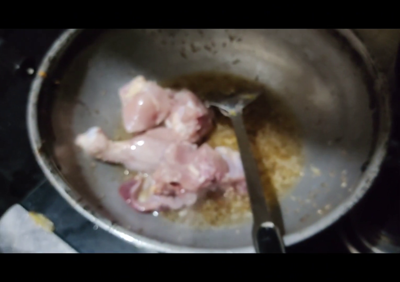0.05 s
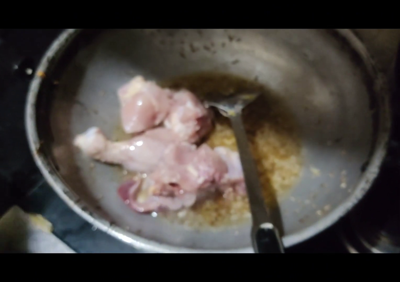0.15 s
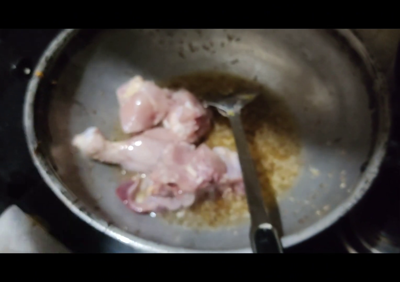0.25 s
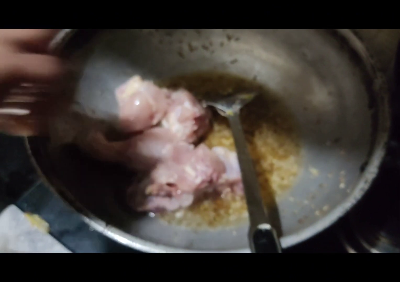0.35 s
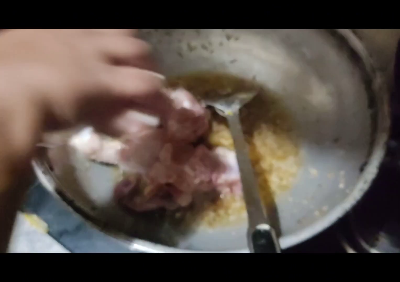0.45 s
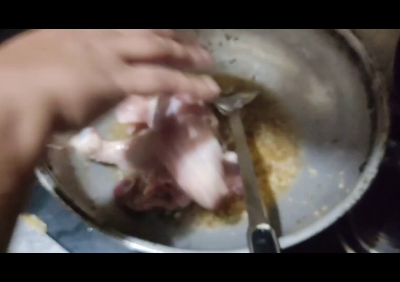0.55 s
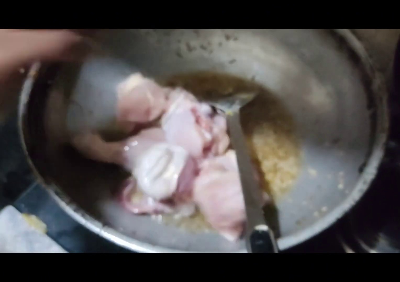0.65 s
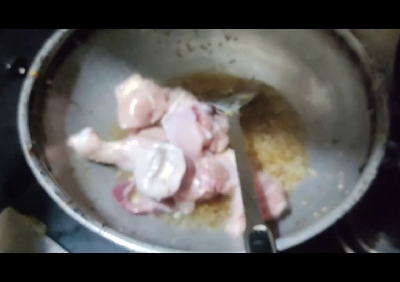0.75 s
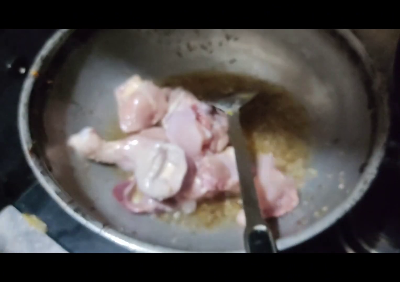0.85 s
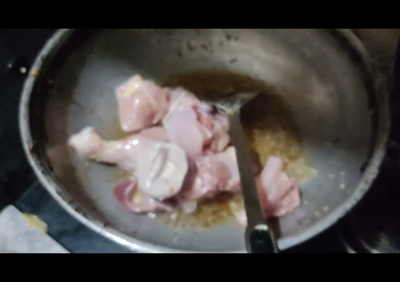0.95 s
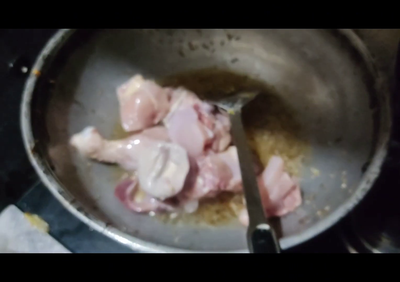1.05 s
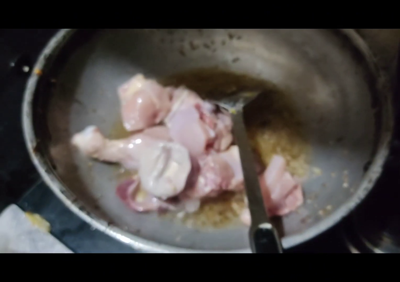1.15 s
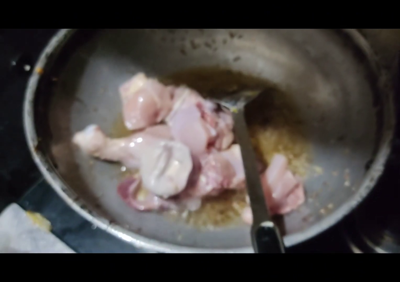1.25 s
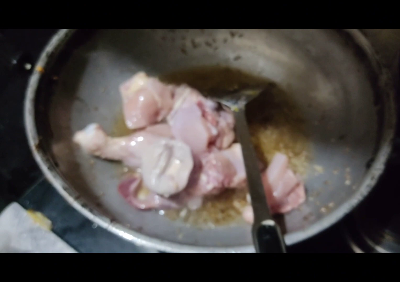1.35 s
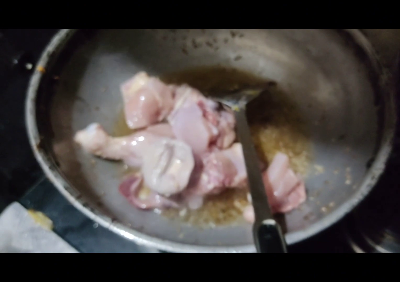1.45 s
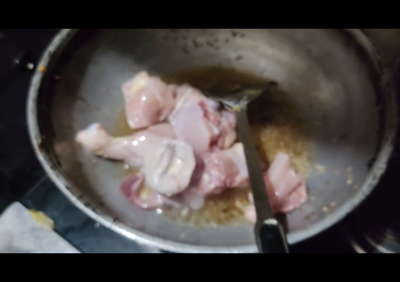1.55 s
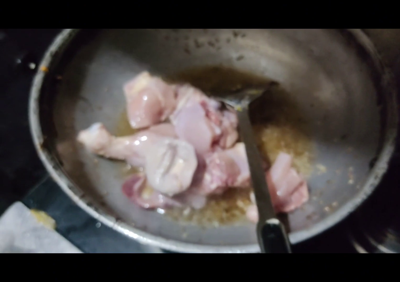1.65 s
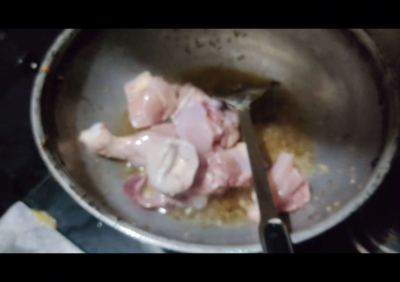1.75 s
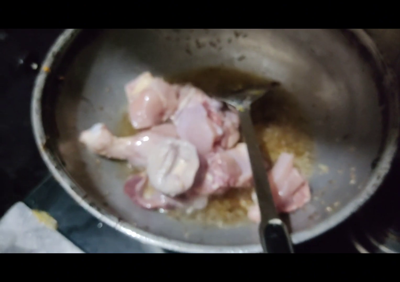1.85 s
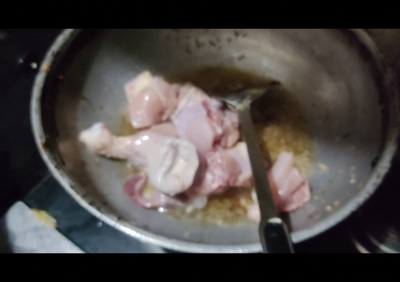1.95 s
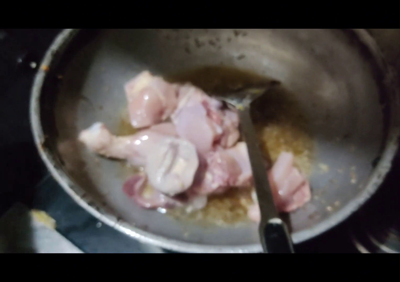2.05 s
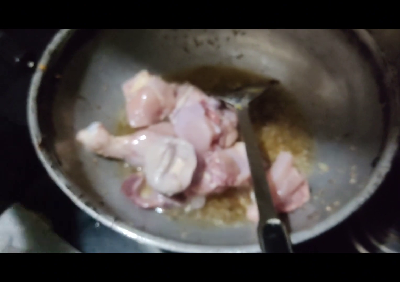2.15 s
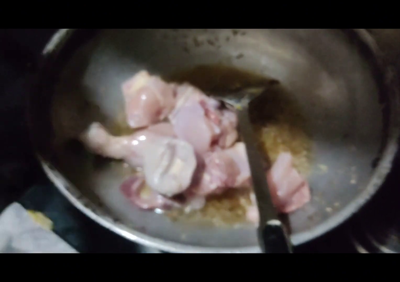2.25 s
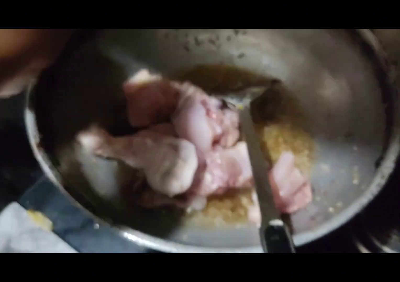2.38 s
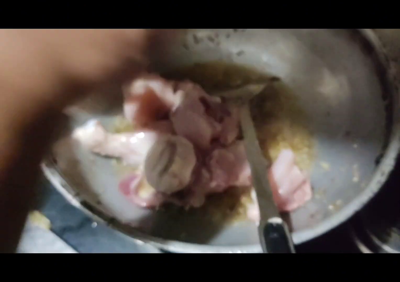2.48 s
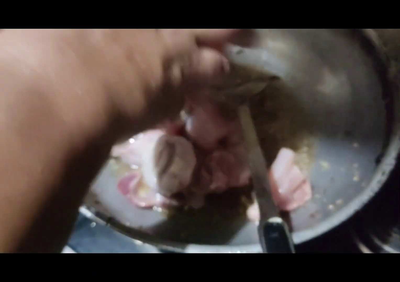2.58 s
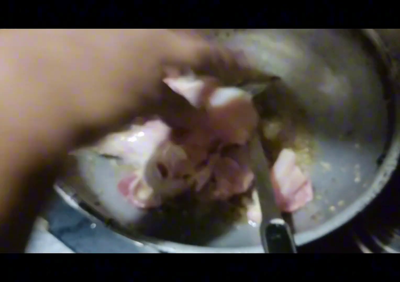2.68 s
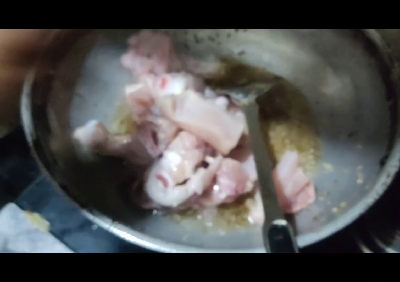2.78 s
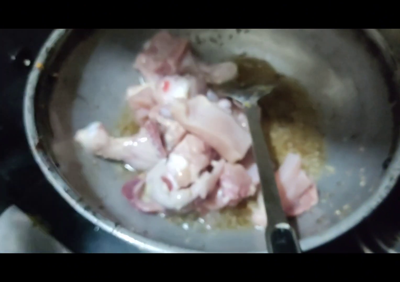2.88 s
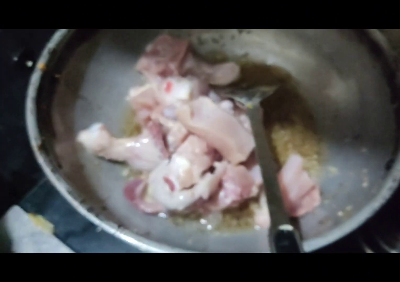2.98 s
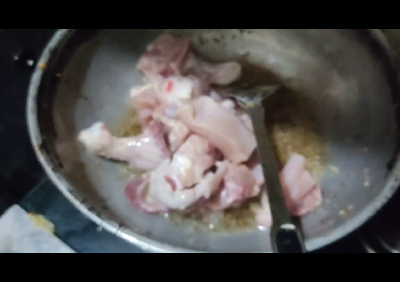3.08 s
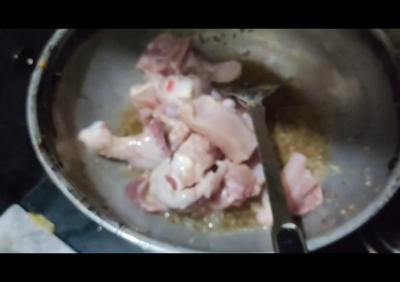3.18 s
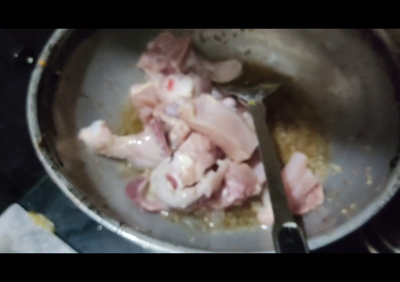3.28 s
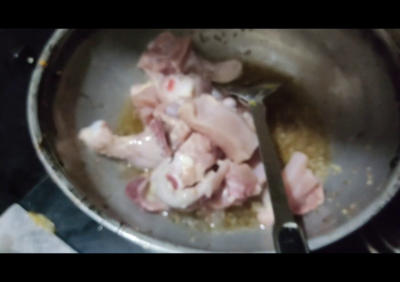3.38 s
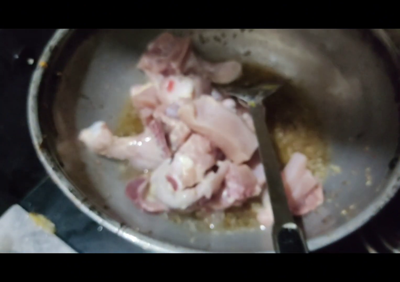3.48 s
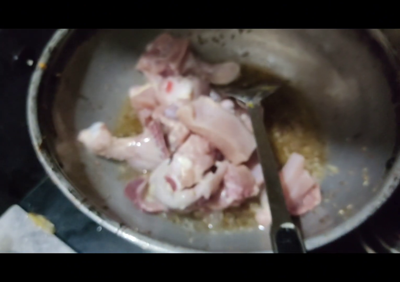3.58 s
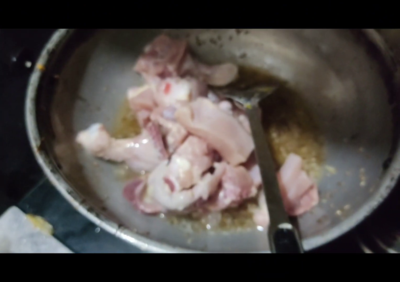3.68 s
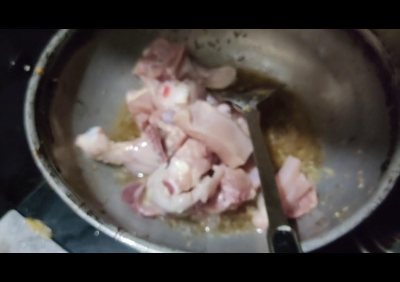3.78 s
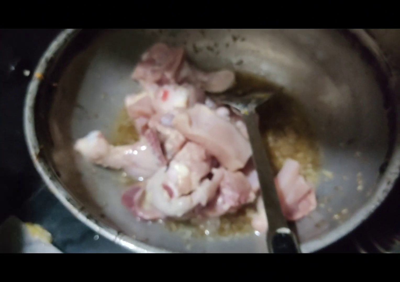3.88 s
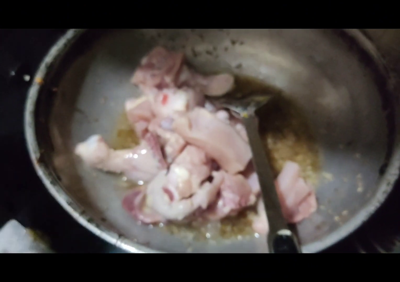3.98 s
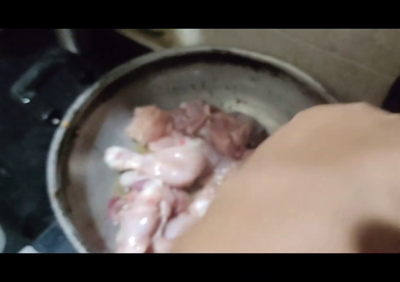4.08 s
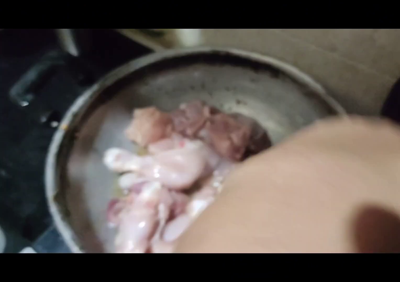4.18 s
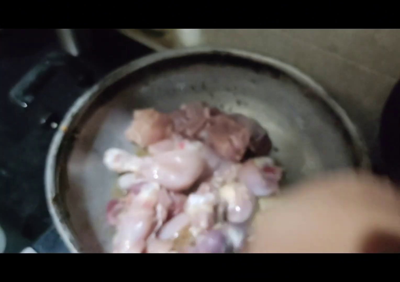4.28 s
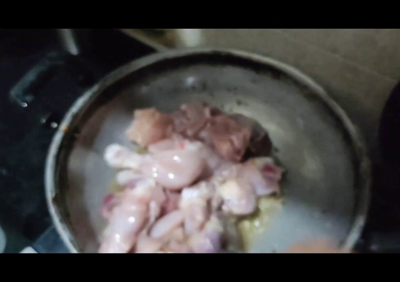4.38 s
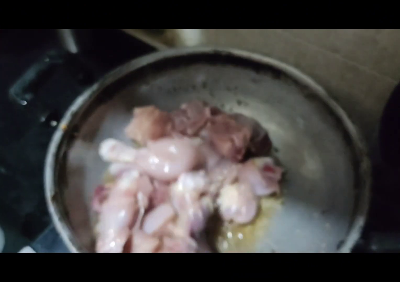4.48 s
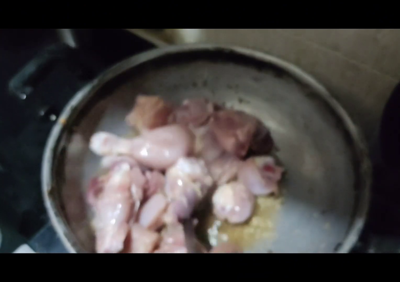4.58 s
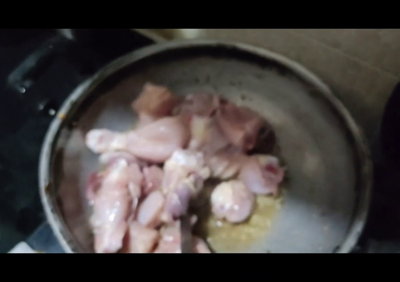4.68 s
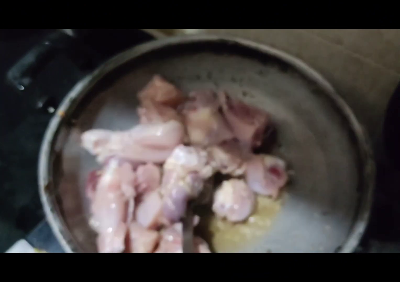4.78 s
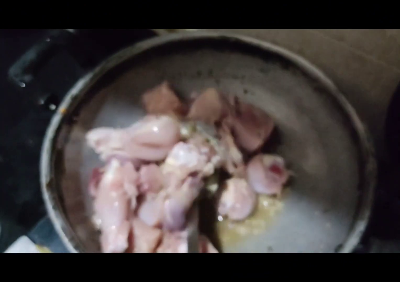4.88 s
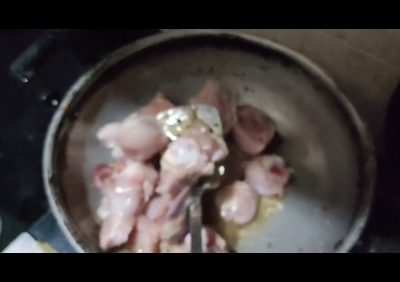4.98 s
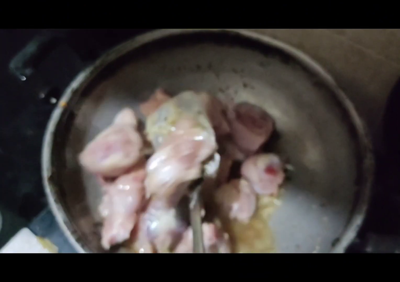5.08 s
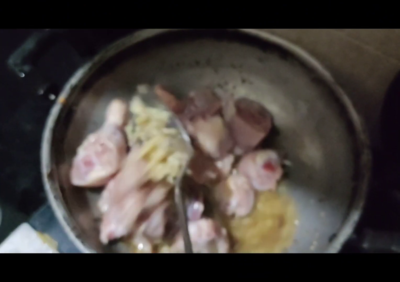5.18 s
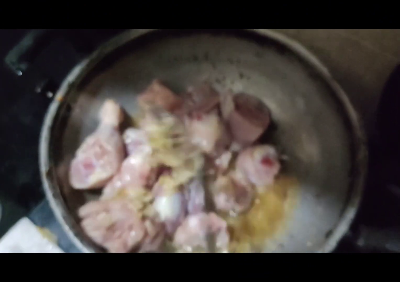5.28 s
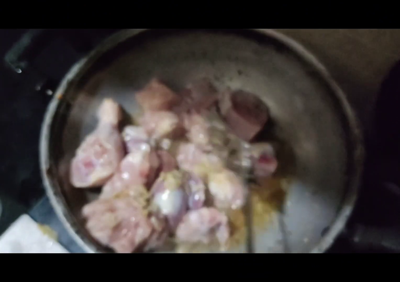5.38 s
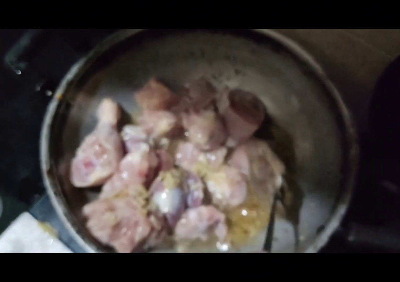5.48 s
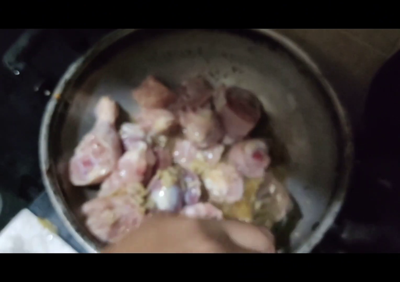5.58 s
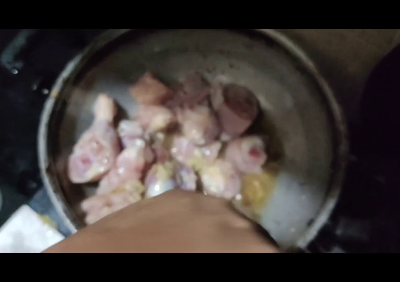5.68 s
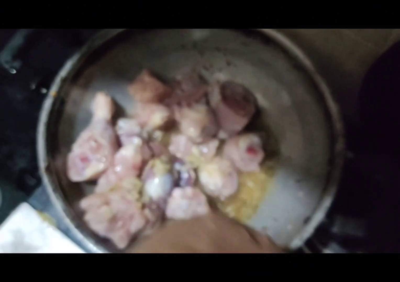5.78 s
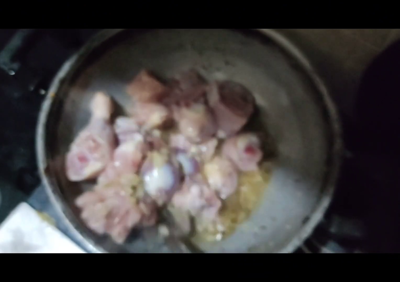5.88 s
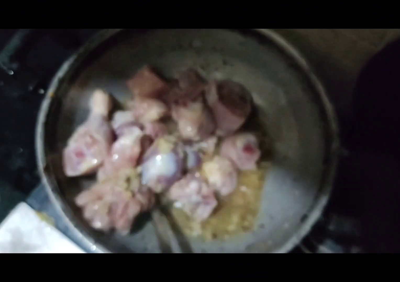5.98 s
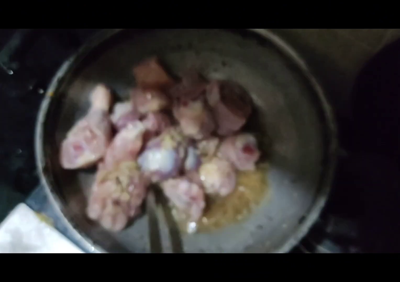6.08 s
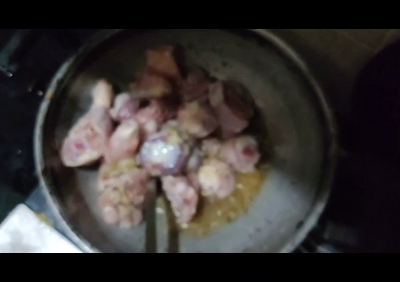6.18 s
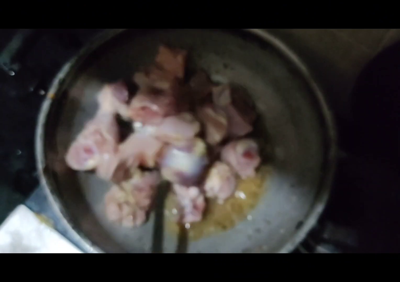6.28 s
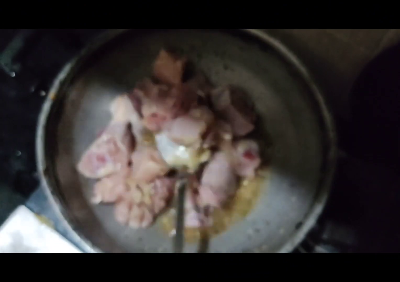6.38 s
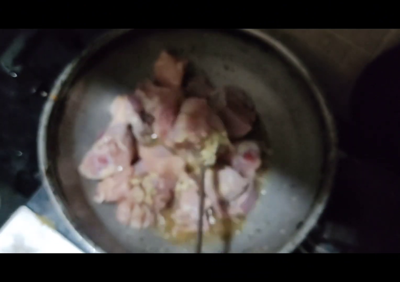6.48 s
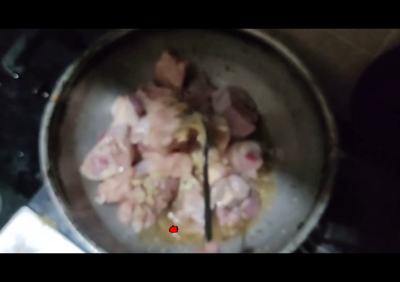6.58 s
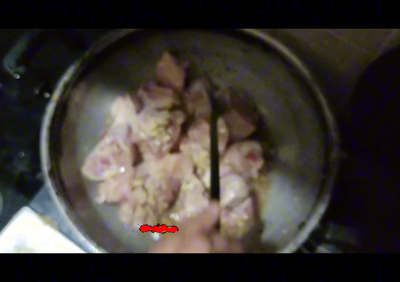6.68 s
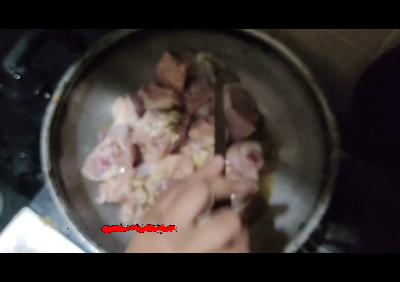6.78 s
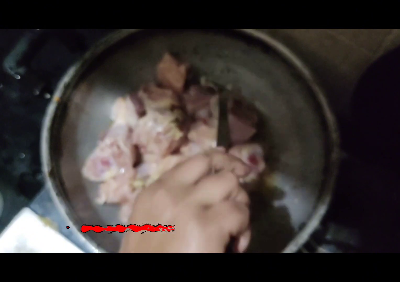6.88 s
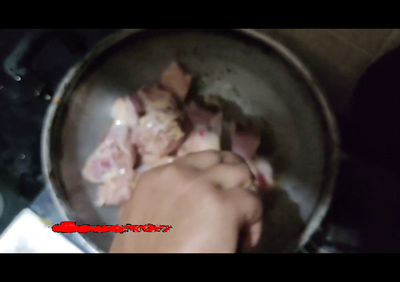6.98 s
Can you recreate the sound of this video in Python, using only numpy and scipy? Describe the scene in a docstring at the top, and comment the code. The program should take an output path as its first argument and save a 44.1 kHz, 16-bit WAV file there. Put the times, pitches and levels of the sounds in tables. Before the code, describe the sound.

A low burner roar and very faint oil fizz run throughout in a small, slightly reflective kitchen, heard close up with handling rumble. At 0.2-0.8 s raw chicken lands in a steel pan: soft dull thuds, wet smacks, a little squelch. A small thump comes at 1.2, then near quiet. At 2.2-2.5 more pieces land with crisp wet crackles, with softer smacks at 2.8 and 3.2. Around 3.65-4.1 faint metal rasping and a weak squeal begin; at 4.3-4.4 meat thumps and the spoon clanks sharply. Wet spits and soft thuds follow to 5.0. At 5.2 a strong clank leads into a bright gritty scrape, with a rough squeal near 5.4, fading by 5.7. A sharp knock at 5.76 joins heavy thuds, then moist tumbling and squelching to 6.8. At 6.92-7.1 a hard low double clank and short scrape finish.

```python
"""A burner rumbles and oil sizzles faintly under a steel pan in a small kitchen, close to a hand-held camera.
Raw chicken drops in from the start: soft pushes ring the pan's bottom, juice films smack, trapped air squelches.
From the middle on a metal spoon stirs: it knocks on steel that the food damps, rubs it with a sliding rasp,
and its edge sticks and slips into squeals, while the meat goes on thudding and smacking wetly."""
import sys
import numpy as np
from scipy import signal
from scipy.fft import rfft, irfft
from scipy.io import wavfile
from scipy.ndimage import uniform_filter1d

SR = 44100
rng = np.random.default_rng(int(sys.argv[2]) if len(sys.argv) > 2 else 0)


def dump_mix(stems):
    """Bounce the given channels to the path in sys.argv[1] as a 16-bit WAV at rate SR."""
    frames = np.atleast_2d(stems).T  # one column per channel
    limited = np.clip(frames, -1, 1)  # hard clip at full scale
    pcm = np.round(limited * 32767).astype(np.int16)
    wavfile.write(sys.argv[1], SR, pcm)


N = 310905
TIME = np.arange(N) / SR

# resonances of the food-damped pan: centre_hz, width_hz, height_db over the broad response
PAN_MODES = [(177.4, 11.3, 14.5), (238, 25, 10.5), (417.7, 19.5, 13), (462, 36, 13.5), (597.6, 20, 9),
             (877, 17, 4), (1078, 26, 6), (1400, 180, 5.5), (1650, 52, 6.5), (1990, 18, 9), (2760, 14, 6.5),
             (6030, 66, 4.5), (6440, 51, 8.5), (8040, 160, 4.5)]
# broad response to a soft push: frequency_hz, relative level_db
SOFT_PUSH = [(30, 10.5), (90, -9), (200, -1), (320, -3.5), (500, -4.5), (850, -5.5), (1500, -17.5),
             (4000, -20)]
# broad response of wet films and spits: frequency_hz, relative level_db
WET_FILM = [(400, 6.5), (900, 7.2), (1500, 2.5), (2400, 4.4), (3300, 0.96), (5000, 5.7), (8000, 6.2),
            (11000, 6.5), (15000, 4.1)]
# the spoon's edge catches and squeals: start_s, length_s, first_hz, last_hz, level_db before trim, tilt_db per octave
EDGE_SQUEALS = [(3.664, 0.188, 929, 971, -34.5, -12.5), (5.293, 0.07, 991, 1025, -26.5, -0.5),
                (5.368, 0.035, 1012, 1016, -17, 4), (5.408, 0.039, 1005, 989, -20, -2),
                (5.43, .063, 997, 1000, -36.5, -14), (7.025, 0.067, 1017, 1013, -32, -8)]
SNAP_S = 0.0085  # decay as a film of juice tears
MOVE_RISE_S, MOVE_SETTLE_S = 0.03, 0.061


def clanks(rise_s=0.0031, treble_trim_db=2, middle_trim_db=1, bass_trim_db=-4, flex_trim_db=-2.5):
    """The spoon chatters on the steel, waking wall or base; the bottom flexes in step with the bass level."""
    # spoon on pan: start_s, treble_db, middle_db, bass_db (before trims), chatter_s, spot_hz, place (0 base to 1 wall)
    knocks = [(3.652, -35.5, -39.5, -34, 0.028, 540, 0.21), (4.2943, -43, -31, -52, 0.002, 1150, .2),
              (4.377, -18, -19, -31, 0.0051, 1130, 1), (4.926, -48, -32, -23.5, 0.0089, 534, 0.44),
              (4.937, -45, -30.5, -33, 0.0037, 560, 0.24), (5.214, -16, -13, -14.5, 0.0063, 920, 0),
              (5.7628, -15, -17.5, -35.5, 0.0046, 1470, 1), (5.948, -42.5, -42.5, -43, 0.013, 2780, 0.97),
              (6.022, -54, -46, -38, 0.012, 2070, 0), (6.122, -38.5, -41.5, -42.5, 0.0083, 1390, 0.44),
              (6.666, -41.5, -38, -49, 0.015, 1380, 0.4), (6.711, -46, -37.5, -25, 0.022, 537, 0.48),
              (6.744, -48, -33.5, -39, 0.0096, 1260, 0.16), (6.9233, -15, -22.5, -9, .0052, 560, 0.46),
              (6.9353, -18.5, -24.5, -19.5, 0.014, 610, 0.43),
              (6.9894, -21.5, -30, -46, .0021, 8200, 0.0067)]
    # modes woken by a blow on the wall: centre_hz, width_hz, height_db
    wall_modes = [(2470, 170, 12), (4380, 145, 13), (5280, 140, 13), (6080, 130, 4)]
    # modes woken by a blow on the base: centre_hz, width_hz, height_db
    base_modes = [(2010, 110, 4.1), (3690, 400, 6.4), (4220, 180, 7.6)]
    # broad response to a metal blow: frequency_hz, relative level_db
    metal = [(100, 1.5), (320, -28.5), (550, -4), (1000, 3), (1800, -3), (2500, -2), (3300, -4), (4500, -2),
             (6500, 2), (8300, 0.5), (15000, -16.5)]
    flex_delay_s = 0.001627  # the bass answers this long after the edge lands
    flex_hz, flex_rise_s, flex_decay_s = 541, 0.0024, 0.0033  # the dented bottom springs back in a few swings
    spot_width_hz, spot_db = 300, 7
    out, t = np.zeros((2, N)), TIME[:2048]
    flex = at_ports(flex_hz * t) * (1 - np.exp(-(t / flex_rise_s) ** 2)) * np.exp(-t / flex_decay_s)
    for s, treble, middle, bass, chatter_s, spot_hz, wall in knocks:
        struck = [(hz, width, db * wall) for hz, width, db in wall_modes]
        struck += [(hz, width, db * (1 - wall)) for hz, width, db in base_modes]
        struck.append((spot_hz, spot_width_hz, spot_db))
        hit = ring(chatter(rise_s, chatter_s), response(metal, PAN_MODES + struck))
        levels = treble + treble_trim_db, middle + middle_trim_db, bass + bass_trim_db
        for part, db, late_s in zip(split(hit), levels, (0, 0, flex_delay_s)):
            add(out, s + late_s, crest(part, db))
        add(out, s + flex_delay_s, crest(flex, bass + flex_trim_db))
    return out


def chatter(rise_s, decay_s, uneven_db=4):
    """A metal edge bounces in a quick string of contacts, a few much harder than the rest."""
    flurry = burst(rise_s, decay_s)
    return flurry * amp(uneven_db * np.clip(rng.standard_normal(flurry.shape[1]), -2, 2))


def scrapes(judder_db=1.0, hiss_trim_db=1, rasp_db=-2, broad_db=-7, body_trim_db=-2, grip=0.089):
    """The edge catches on countless scratches; rasping resonances slide with the point of contact."""
    # spoon pushed along steel: start_s, rise_s, fall_s, hiss_db, middle_db, body_db (before trims),
    # rasp_hz at the pressure peak, slide_hz per s
    pushes = [(3.657, 0.11, 0.34, -33.5, -36, -38.5, 2450, -1000),
              (3.931, 0.21, .17, -39.5, -34, -60.5, 2080, -2300),
              (5.265, 0.11, 0.24, -26, -31.5, -41.5, 2407, -300),
              (5.366, 0.062, 0.02, -22, -34, -43, 3370, 1500),
              (5.52, 0.083, .2, -28.5, -29, -45.5, 2067, -2200),
              (6.985, 0.031, .12, -23.5, -30.5, -39, 1974, -1000)]
    # the rasp's sliding resonances: multiple of its centre, level_db
    rasp_peaks = [(0.702, 9), (.86, 14.5), (1, 14.5), (1.17, 8), (1.42, 3), (1.78, 12.5)]
    # broad response to rubbing: frequency_hz, relative level_db
    rubbed = [(100, -14), (320, -19), (550, -2.5), (1000, 4.5), (1550, -7.5), (2600, -1), (4000, 0.5),
              (6500, 3.5), (8300, -0.5), (9700, -2.5), (12000, -6.5), (15000, -12)]
    rasp_waver = 0.029  # the point of contact wanders, as a share of the resonance
    out = np.zeros((2, N))
    slip_hz = np.interp(TIME, [row[0] for row in EDGE_SQUEALS], [row[2] for row in EDGE_SQUEALS])
    sticking = grip * sum(arch(s, length) for s, length, *_ in EDGE_SQUEALS)
    scratches = repeat(grains(13000, 2.9) * amp(judder_db * wander(71)), slip_hz, sticking)
    for s, rise, fall, hiss_db, middle_db, body_db, centre_hz, slide in pushes:
        press = pressure(s, rise, fall)
        on = press > 0
        force = scratches[:, on]
        hz = centre_hz + slide * (TIME[on] - s - rise)
        hz = hz * (1 + rasp_waver * wander(30)[on])
        surface = response(rubbed, PAN_MODES + scatter(50, 2200, 9000, 40, 8))
        friction = ring(rebound(force, hz), surface)
        hiss, broad, body = map(unit, split(friction))
        rasp = unit(sum(amp(db) * resonate(force, ratio * hz, 190) for ratio, db in rasp_peaks))
        middle = amp(middle_db) * (amp(rasp_db) * rasp + amp(broad_db) * broad)
        outer = amp(hiss_db + hiss_trim_db) * hiss + amp(body_db + body_trim_db) * body
        out[:, on] += press[on] * (outer + middle)
    return out


def pressure(start_s, rise_s, fall_s, edge_s=0.0076):
    """The spoon bears down to a peak, then eases off and lifts."""
    bite_db, lift_db, bite_curve, lift_curve = -28.5, -33, 6.5, 1.4  # start and end, relative to the peak
    t = TIME - start_s - rise_s
    db = bite_db * np.clip(-t / rise_s, 0, 1) ** bite_curve
    db = db + lift_db * np.clip(t / fall_s, 0, 1) ** lift_curve
    return amp(db) * np.clip(1 + np.minimum(t + rise_s, fall_s - t) / edge_s, 0, 1)


def repeat(force, hz, grip, count=5):
    """While the edge sticks and slips, each slip partly repeats the ones before."""
    total = force
    for k in range(1, count):
        earlier = np.array([np.interp(TIME - k / hz, TIME, port) for port in force])
        total = total + grip ** k * earlier
    return total / np.sqrt(sum(grip ** (2 * k) for k in range(count)))


def rebound(force, hz):
    """Each scratch returns from the rim; the path changes as the spoon travels, so a comb slides with the rasp."""
    return_cycles, return_share = 5, 0.35
    t = TIME[:len(hz)]
    returned = np.array([np.interp(t - return_cycles / hz, t, port) for port in force])
    return force + return_share * returned


def squeals(jitter=0.0022, trim_db=2):
    """Uneven stick-slip cycles give a rough stack of partials, each fluttering by itself."""
    # partials of a squeal: multiple of the pitch, level_db before tilt
    orders = [(1, -1), (2, 1), (3, -4.5), (4, 1.5), (5, -10), (6, -1), (7, -17), (8, -6.5)]
    flutter_db = 2.6
    swell_power = 0.32  # applied to a sine arch
    out, waver = np.zeros((2, N)), wander(290)
    flutters = [amp(flutter_db * wander(60)) for _ in orders]
    for s, length, first_hz, last_hz, db, tilt in EDGE_SQUEALS:
        gate = arch(s, length, skew=0.45) ** swell_power
        on = gate > 0
        hz = np.linspace(first_hz, last_hz, on.sum()) * (1 + jitter * waver[on])
        turns = np.cumsum(hz) / SR
        sizes = np.array([amp(order_db + tilt * np.log2(k)) for k, order_db in orders])
        sizes *= amp(db + trim_db) / np.linalg.norm(sizes)
        for (k, _), size, flutter in zip(orders, sizes, flutters):
            partial = at_ports(k * turns + rng.random())
            out[:, on] += size * gate[on] * unit(flutter[on]) * partial
    return out


def rim(flutter_db=2.0, trim_db=1.0):
    """As the edge travels it rubs several lightly damped modes of the steel, often at once, into a rough song."""
    # sung modes, many overlapping: start_s, length_s, first_hz, last_hz, level_db before trim
    songs = [(3.655, 0.037, 510, 526, -41), (3.675, 0.052, 2944, 2870, -40), (3.76, 0.11, 2050, 1986, -44),
             (3.976, 0.045, 2300, 2370, -42), (3.99, 0.078, 1910, 1860, -44.5),
             (4.03, 0.028, 1380, 1210, -38), (4.07, 0.049, 2400, 2330, -43),
             (4.119, 0.071, 1896, 2044, -40), (4.184, 0.026, 1510, 1450, -40), (5.29, .05, 6420, 6390, -35),
             (5.295, 0.06, 2990, 2990, -33.5), (5.328, 0.09, 2680, 2670, -42),
             (5.32, 0.073, 2390, 2430, -34), (5.334, 0.057, 1710, 1725, -37.5),
             (5.366, 0.058, 4130, 4070, -27.5), (5.391, 0.081, 2990, 3006, -35),
             (5.376, 0.07, 6100, 6030, -29.5), (5.378, 0.057, 8260, 8170, -30),
             (5.396, .032, 3760, 3790, -28), (5.42, 0.031, 3960, 3970, -28),
             (5.35, 0.19, 2020, 1990, -28.5), (5.427, 0.032, 2350, 2320, -29.5),
             (5.447, 0.053, 1663, 1645, -36), (5.524, 0.066, 1457, 1306, -34.5),
             (5.556, 0.023, 2046, 1983, -26), (5.585, 0.029, 1980, 1920, -37),
             (5.632, 0.03, 1325, 1336, -29.5), (5.66, 0.047, 1550, 1445, -35),
             (7.007, 0.04, 2035, 2035, -37)]
    jitter = 0.0065  # share of the pitch
    out, waver, flutter = np.zeros((2, N)), wander(230), amp(flutter_db * wander(90))
    for s, length, first_hz, last_hz, db in songs:
        gate = arch(s, length)
        on = gate > 0
        hz = np.linspace(first_hz, last_hz, on.sum()) * (1 + jitter * waver[on])
        turns = np.cumsum(hz) / SR
        out[:, on] += amp(db + trim_db) * unit(gate[on] * flutter[on]) * at_ports(turns)
    return out


def thuds(rise_s=0.00026, knock_trim_db=-1, boom_trim_db=-1):
    """Soft pushes of meat ring the low modes of the pan's bottom, most of all the one under the piece."""
    # meat landing or tumbling: start_s, knock_db, boom_db (before trims), note_hz of the struck spot
    landings = [(.272, -34.5, -53, 514), (0.374, -35, -32.5, 196), (0.412, -44, -41, 603),
                (.459, -34.5, -53, 440), (0.508, -43, -57, 403), (0.622, -44.5, -57, 530),
                (1.164, -41, -51.5, 385), (2.37, -36, -46, 500), (2.399, -63, -41, 167),
                (2.435, -51, -46, 172), (2.487, -41.5, -45, 420), (2.53, -53, -44, 396),
                (3.169, -43.5, -60, 658), (3.851, -30, -37.5, 480), (4.226, -44, -35, 243),
                (4.299, -29.5, -42, 270), (4.355, -29.5, -35, 487), (4.458, -29.5, -35, 438),
                (4.583, -49, -36, 177), (4.679, -49, -37, 243), (4.861, -39, -39, 423),
                (4.94, -35, -37, 170), (5.228, -39, -34.5, 515), (5.638, -30, -27.5, 247),
                (5.773, -25, -30, 255), (5.803, -26.5, -38, 574), (5.95, -41.5, -35.5, 250),
                (6.016, -41.5, -31.5, 274), (6.121, -41, -39, 245), (6.184, -44, -47, 510),
                (6.61, -42.5, -35.5, 233), (6.731, -32.5, -29.5, 242), (6.767, -46, -40, 162),
                (6.804, -39.5, -44, 460), (6.939, -41, -26.5, 286), (6.967, -44, -43, 250)]
    note_db, note_share = 18, 0.12  # the note's height, and its width over its pitch
    settle_s = 0.016  # decay as a piece comes to rest
    out = np.zeros((2, N))
    for s, knock, boom, note_hz in landings:
        note = (note_hz, note_hz * note_share, note_db)
        bottom = response(SOFT_PUSH, PAN_MODES + [note], size=8192)
        push = ring(burst(rise_s, settle_s), bottom)
        add(out, s, crest(band(push, 424, 2800), knock + knock_trim_db))
        add(out, s, crest(band(push, 44, 282), boom + boom_trim_db))
    return out


def smacks(rise_s=0.0013, treble_trim_db=0, middle_trim_db=-1):
    """Films of juice and oil snap in short crackles over a softer slap, each coloured by its own tiny cavities."""
    # wet smacks and spits of oil: start_s, treble_db, middle_db (before trims), cavity_hz of the main cavity
    films = [(0.164, -39, -47, 6060), (0.251, -43.5, -42, 2230), (0.375, -48, -43.5, 960),
             (0.623, -60, -44, 795), (.642, -52, -49, 2390), (.722, -65, -48, 1800),
             (0.8103, -34, -40.5, 6000), (0.888, -41, -44.5, 6200), (1.162, -62, -43.5, 980),
             (2.205, -30.5, -46.5, 2690), (2.282, -45, -56, 4100), (2.314, -31.5, -48, 8240),
             (2.367, -26.5, -44.5, 7340), (2.77, -42.5, -37, 1660), (2.811, -42, -38, 870),
             (3.166, -43.5, -38.5, 925), (4.572, -40, -60, 7500), (4.605, -35, -67, 7900),
             (4.637, -27, -65, 2700), (4.66, -43, -54, 2140), (4.901, -44.5, -38.5, 2670),
             (5.0335, -41.5, -70, 5460), (5.987, -40, -46, 2750), (6.06, -65, -52, 2400),
             (6.094, -27.5, -54, 2720), (6.269, -36, -47, 3000), (6.278, -30.5, -44.5, 2220),
             (6.493, -37, -41.5, 850)]
    cavity_width_hz, cavity_db = 410, 10
    slap_rise_s, slap_s = 0.0013, 0.017  # the flesh around slaps down more slowly
    out = np.zeros((2, N))
    for s, treble, middle, cavity_hz in films:
        cavities = scatter(8, 900, 9000, 260, 6)
        wet = response(WET_FILM, cavities + [(cavity_hz, cavity_width_hz, cavity_db)])
        snap = ring(burst(rise_s, SNAP_S), wet)
        flesh = ring(burst(slap_rise_s, slap_s), wet)
        crackle, slap = band(snap, 3000, 17000), band(flesh, 550, 3000)
        add(out, s, crest(crackle, treble + treble_trim_db) + crest(slap, middle + middle_trim_db))
    return out


def squelches_and_tap(rough=0.075):
    """Air escaping under the meat glides in pitch as its pocket changes size; a dull spoon tap rings as briefly."""
    # squeezed air, and at 4.292 s the short ring of a dull spoon tap: start_s, level_db, first_hz, last_hz, length_s
    glides = [(0.715, -50.5, 858, 802, 0.12), (1.31, -57, 2060, 2310, 0.039), (2.802, -55, 956, 830, 0.067),
              (4.292, -36, 1150, 1010, 0.015), (4.569, -47.5, 1520, 2320, 0.015),
              (5.881, -34.5, 993, 1210, 0.018)]
    out, waver = np.zeros((2, N)), wander(340)
    for s, db, first_hz, last_hz, length in glides:
        n = round(length * SR)
        hz = np.linspace(first_hz, last_hz, n) * (1 + rough * waver[round(s * SR):][:n])
        note = np.hanning(n) * np.sin(2 * np.pi * np.cumsum(hz) / SR)
        add(out, s, amp(db) * unit(note))
    return out


def slither(bottom, lumps_db=2.5, spits_db=-3, spits_per_s=22):
    """Sliding meat rubs the pan's bottom in lumps, crackles with juice and lets off small wet spits."""
    creep_db = -57.5  # the heap keeps settling between moves
    rubbing, wetness, _ = motion()
    rub = unit(ring(grains(700, 2.2), bottom) * amp(lumps_db * wander(8.1)))
    juice = unit(band(grains(900, 2.6), 480, 3800))
    tears = ring(grains(spits_per_s, 0.84), burst(0.00072, SNAP_S))
    spits = unit(ring(tears, response(WET_FILM)))
    return (rubbing + amp(creep_db)) * rub + wetness * (juice + amp(spits_db) * spits)


def motion():
    """Gains of rub, juice and rumble: every move gets going quickly, holds and settles."""
    # meat shifted by hand or spoon, jostling the camera: start_s, length_s, rub_db, juice_db, rumble_db
    moves = [(0.216, 0.071, -47, -61, -48), (0.368, 0.075, -42.5, -64, -42), (0.595, 0.39, -55, -61.5, -66),
             (2.222, 0.34, -49, -58, -49.5), (2.593, 0.5, -64.5, -60, -71),
             (3.566, 0.045, -51.5, -58.5, -71), (3.79, 0.39, -54, -51, -53), (4.3, 0.4, -49.5, -65, -50),
             (4.842, 0.085, -41, -71, -46), (5.652, 0.43, -45.5, -58, -58), (6.17, 0.34, -55, -62.5, -67),
             (6.595, 0.5, -53, -65, -50), (6.69, 0.06, -61, -65, -68)]
    return sum(amp(dbs)[:, None] * swell(s, length, MOVE_RISE_S, MOVE_SETTLE_S) for s, length, *dbs in moves)


def stove(flame_db=-52, oil_db=-55, waver_db=2.2):
    """The burner's low roar, the fine fizz of warm oil, and the rumble of the hand on the camera."""
    # the flame flutters as the arm passes: start_s, length_s, level_db
    draughts = [(2.243, 0.58, -51.5), (4.886, 0.11, -42.5)]
    # juice reaches the hot oil and the fizz flares up: start_s, length_s, level_db
    juice_flares = [(0.726, 0.86, -51), (2.08, 0.79, -54.5), (3.22, 1.65, -53.5), (5.525, 0.83, -50.5)]
    # broad roar of the flame: frequency_hz, relative level_db
    burner = [(25, -29), (45, -22.5), (65, 0), (100, 2.5), (150, -7.5), (230, -12.5), (310, -9.5),
              (440, -15.5), (620, -17), (900, -16), (1500, -24.5), (3000, -60), (8000, -51)]
    # the roar drones in the hollow under the pan: centre_hz, width_hz, height_db
    hollow = [(111, 12, 8.5), (176.4, 17, 8), (407, 12, 10.5)]
    # broad fizz of the oil: frequency_hz, relative level_db
    sizzle = [(500, 1), (1500, 0), (2400, 2.5), (3400, -3), (4700, 2), (5500, 8), (6600, 5.5), (7700, 6.5),
              (9000, 2.5), (15000, -7)]
    # broad rumble of the hand-held camera: frequency_hz, relative level_db
    handling = [(15, 6), (28, -23), (39, -8), (70, 11), (140, -34), (500, -100)]
    flare_rise_s, flare_fade_s = 0.31, 0.031
    flutter = sum(amp(db) * swell(s, length, MOVE_RISE_S, MOVE_SETTLE_S) for s, length, db in draughts)
    roar = unit(ring(rng.standard_normal((2, N)), response(burner, hollow, size=16384)))
    flame = roar * np.hypot(amp(flame_db + waver_db * wander(79)), flutter)
    flares = sum(amp(db) * swell(s, length, flare_rise_s, flare_fade_s) for s, length, db in juice_flares)
    fizz = unit(ring(grains(16000, 0.32), response(sizzle)))
    oil = fizz * np.hypot(amp(oil_db), flares) * amp(wander(3))
    _, _, rumble = motion()
    sway = unit(ring(rng.standard_normal((2, N)), response(handling, size=16384))) * rumble
    return flame + oil + sway


def kitchen(x, gap_s=0.004):
    """Dense reflections from near walls, each band dying at its own speed."""
    # reverberation: frequency_hz, t60_s
    decay_times = [(150, 0.49), (500, 0.34), (1500, 0.34), (4000, 0.3), (10000, 0.23)]
    hz, t, z = signal.stft(rng.standard_normal((2, SR // 2)), SR, nperseg=256)
    t60 = read(decay_times, hz)[:, None]
    tail = signal.istft(z * 1e-3 ** (t / t60), SR, nperseg=256)[1]
    tail = tail * np.clip(TIME[:tail.shape[1]] / gap_s - 1, 0, 1)  # silent for one gap, full after two
    return ring(x, tail / np.linalg.norm(tail[0]))


def amp(db):
    """Decibels to gain."""
    return 10 ** (np.asarray(db) / 20)


def unit(x):
    """Scales to rms 1."""
    return x / np.sqrt(np.mean(x ** 2) + 1e-20)


def read(points, hz):
    """Reads a table on a log-frequency axis."""
    f, value = np.transpose(points)
    return np.interp(np.log(hz + 1), np.log(f + 1), value)


def add(mix, s, sound):
    """Mixes a sound in at time s."""
    part = mix[:, round(s * SR):][:, :sound.shape[-1]]
    part += sound[..., :part.shape[1]]


def wander(rate_hz):
    """Smooth chance of rms 1, fading out above about the given rate."""
    hz = np.fft.rfftfreq(N, 1 / SR)
    return unit(irfft(rfft(rng.standard_normal(N)) * np.exp(-(hz / rate_hz) ** 2), N))


def band(x, low_hz, high_hz):
    """Causal band-pass."""
    sos = signal.butter(3, [low_hz, min(high_hz, SR / 2 - 1)], "band", fs=SR, output="sos")
    return signal.sosfilt(sos, x)


def split(x):
    """Treble, middle and bass of a sound."""
    return band(x, 3000, 17000), band(x, 900, 3000), band(x, 210, 800)


def response(spectrum, modes=(), size=4096):
    """Causal impulse response of a broad spectrum with resonances standing on it."""
    hz = abs(np.fft.fftfreq(size, 1 / SR))
    peaks = 1 + sum((amp(db) ** 2 - 1) / (1 + (2 * (hz - f) / width) ** 2) for f, width, db in modes)
    log_gain = np.log(amp(read(spectrum, hz)) * np.sqrt(np.maximum(peaks, 1e-2)))
    minimum_phase = np.exp(np.conj(signal.hilbert(log_gain)))
    return np.fft.ifft(minimum_phase).real[None, :size // 2]


def ring(x, body):
    """Passes a two-channel force through a response."""
    return signal.oaconvolve(x, body, axes=1)[:, :x.shape[1]]


def scatter(count, low_hz, high_hz, width_hz, db):
    """Resonances that fall by chance: each spot of contact wakes its own."""
    place, height = rng.random((count, 2)).T
    centres = low_hz + (high_hz - low_hz) * place
    return list(zip(centres, np.full(count, width_hz), db * (.4 + .6 * height)))


def resonate(x, hz, width_hz):
    """A steep resonance that follows the curve hz."""
    turn = np.exp(2j * np.pi * np.cumsum(hz) / SR)
    r = np.exp(-np.pi * width_hz / SR)
    # shift the curve down to zero frequency, smooth twice, shift back up
    return unit((turn * signal.lfilter([1], [1, -2 * r, r * r], x / turn)).real)


def grains(per_s, spread_db):
    """Random tiny impacts of uneven size, as each microphone port gets them."""
    size = amp(spread_db * np.minimum(rng.exponential(1, N), 4)) * (rng.random(N) < per_s / SR)
    return unit(size * rng.standard_normal((2, N)))


def burst(rise_s, decay_s, size=8192):
    """A flurry of contacts that builds quickly and dies away."""
    t = np.arange(size) / SR
    return rng.standard_normal((2, size)) * (1 - np.exp(-t / rise_s)) * np.exp(-t / decay_s)


def crest(x, db, size=220):
    """Scales a hit so that its loudest few milliseconds have the given level."""
    return x * amp(db) / np.sqrt(uniform_filter1d((x ** 2).mean(0), size).max() + 1e-20)


def at_ports(turns):
    """A vibration as the two ports get it, a quarter cycle apart."""
    return np.array([np.sin(2 * np.pi * turns), np.cos(2 * np.pi * turns)])


def swell(start_s, length_s, rise_s, fade_s):
    """Attack, hold, and a dying release."""
    release = np.exp(-np.maximum(TIME - start_s - length_s, 0) / fade_s)
    return np.clip((TIME - start_s) / rise_s, 0, 1) * release


def arch(start_s, length_s, skew=1):
    """Half a sine from start to end, zero outside; a skew under one brings the top forward."""
    u = np.clip((TIME - start_s) / length_s, 0, 1)
    return np.maximum(np.sin(np.pi * u ** skew), 0) * (u < 1)


def scene(room_db=-8):
    """Spoon and food in the pan, the room's answer to them, and the stove beneath."""
    bottom = response(SOFT_PUSH, PAN_MODES, size=8192)
    pan = clanks() + scrapes() + squeals() + rim()
    food = thuds() + smacks() + slither(bottom)
    contacts = pan + food + squelches_and_tap()
    return contacts + amp(room_db) * kitchen(contacts) + stove()


def record(dry, lead_s=0.00027):
    """Two ports share the bass, which the right gets early; the microphone dulls the top; then the band limit."""
    # likeness of the ports: frequency_hz, left-right correlation
    likeness = [(60, 0.97), (250, 0.98), (600, 0.99), (1400, 0.16), (3000, 0), (15000, 0)]
    # balance of the ports: frequency_hz, left-over-right level_db
    balance = [(60, 5.5), (200, 6), (400, 4), (1300, 2.5), (2400, 0.5), (4500, 0), (6500, -2), (7600, 8),
               (8400, 11.5), (9500, 4.5), (12000, 0.5)]
    # microphone response: frequency_hz, level_db
    microphone = [(20, -2.5), (7500, -0.5), (8400, -3), (9200, -8), (9750, -16.5), (12000, -18.5),
                  (15000, -18)]
    # reflections from close surfaces cancel in narrow bands: centre_hz, width_hz, depth_db
    dips = [(325, 73, -7), (3180, 44, -9), (4770, 62, -7)]
    edge_hz = 15400
    hz, (left, right) = np.fft.rfftfreq(N, 1 / SR), rfft(dry)
    same = np.clip(read(likeness, hz), -1, 1)
    lean = amp(read(balance, hz) / 2)
    shared = same * left * np.exp(2j * np.pi * hz * lead_s)
    right = shared + np.sqrt(1 - same ** 2) * right
    ports = irfft(np.array([left * lean, right / lean]), N)
    coloured = ring(ports, response(microphone, dips))
    low_pass = signal.firwin(511, edge_hz, window=("kaiser", 9), fs=SR)
    return signal.oaconvolve(coloured, low_pass[None], "same")


dry = scene()
out = record(dry)
dump_mix(out)
```